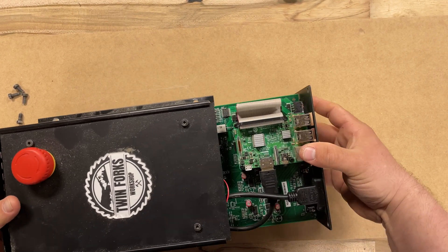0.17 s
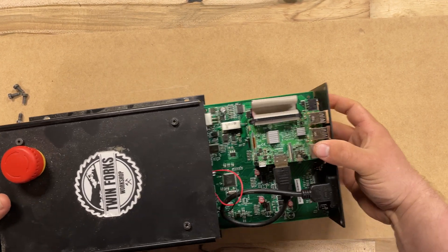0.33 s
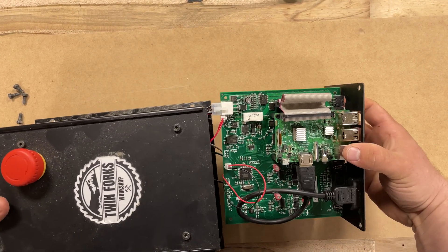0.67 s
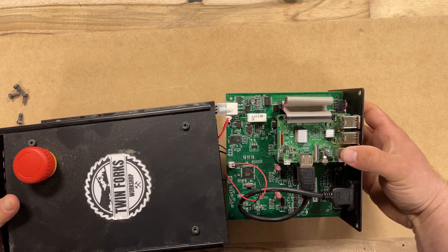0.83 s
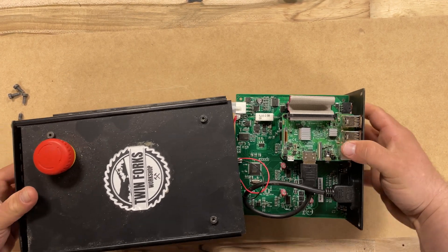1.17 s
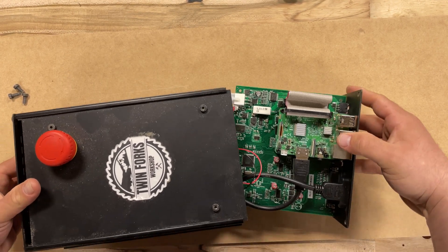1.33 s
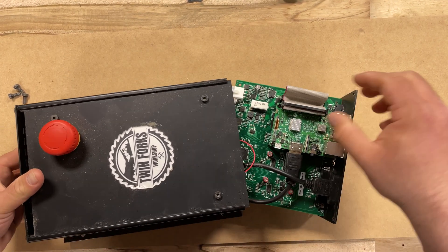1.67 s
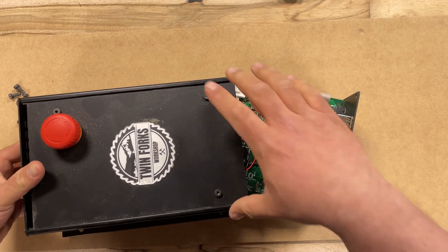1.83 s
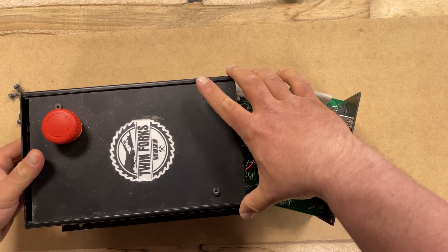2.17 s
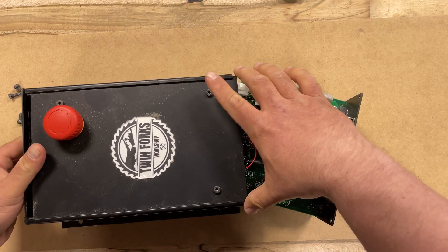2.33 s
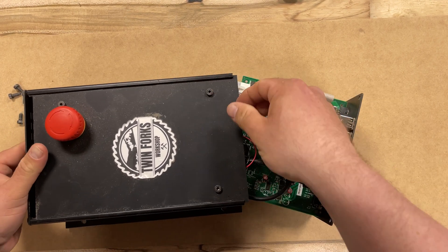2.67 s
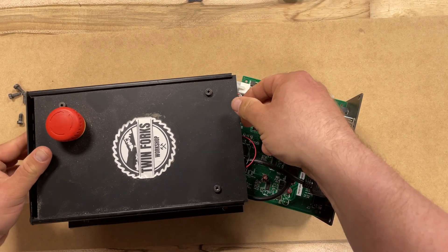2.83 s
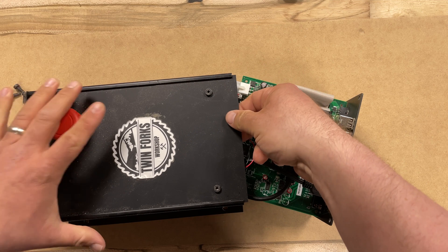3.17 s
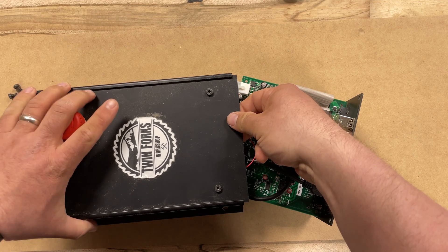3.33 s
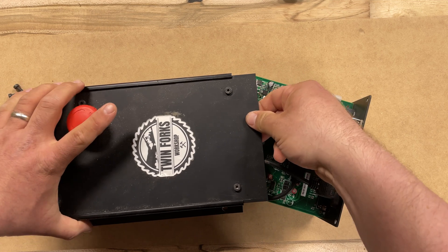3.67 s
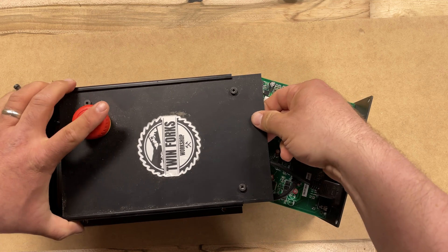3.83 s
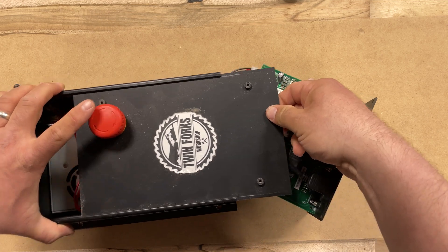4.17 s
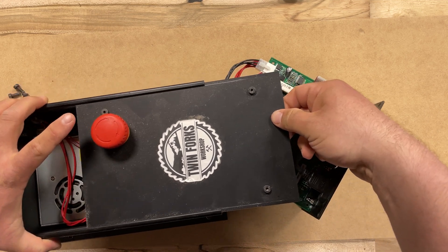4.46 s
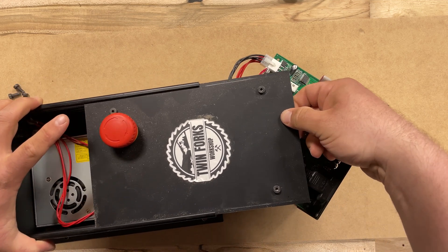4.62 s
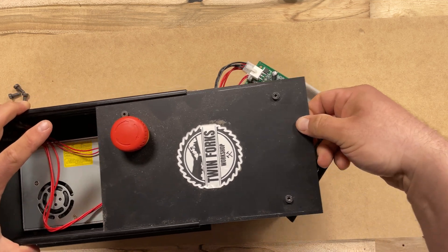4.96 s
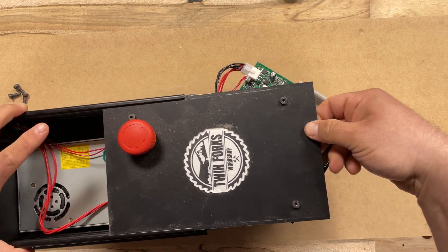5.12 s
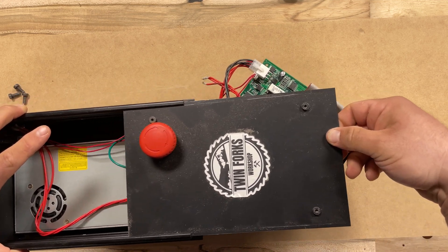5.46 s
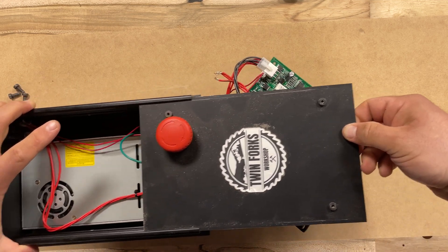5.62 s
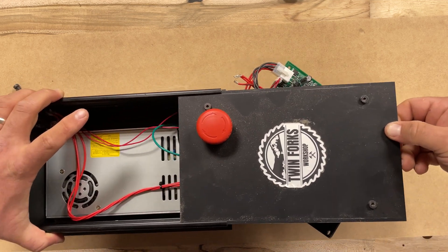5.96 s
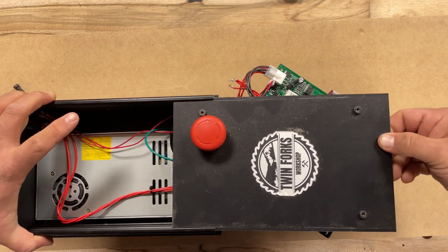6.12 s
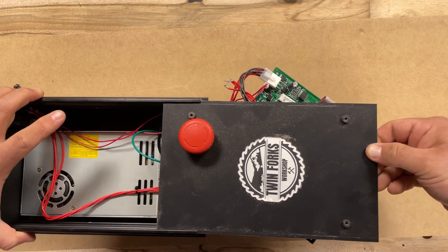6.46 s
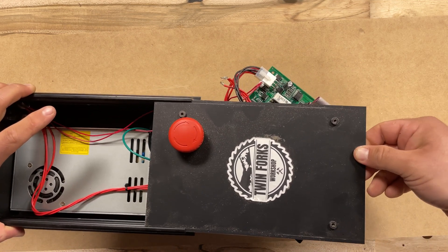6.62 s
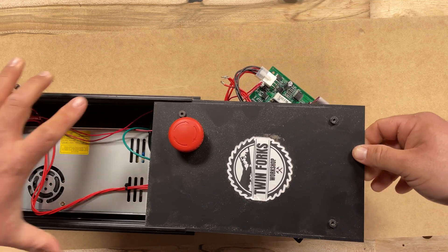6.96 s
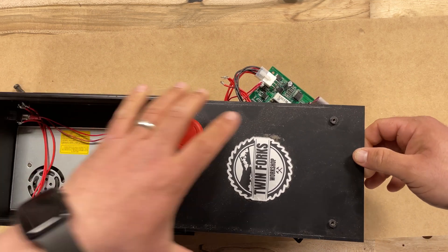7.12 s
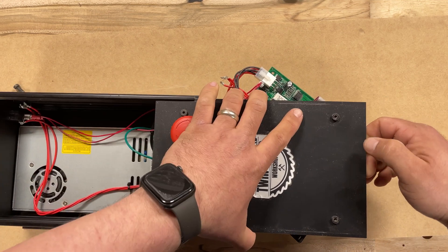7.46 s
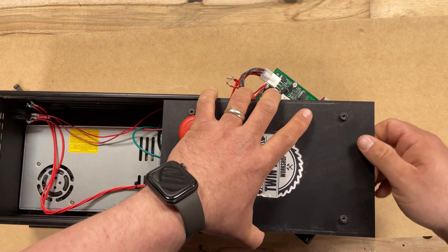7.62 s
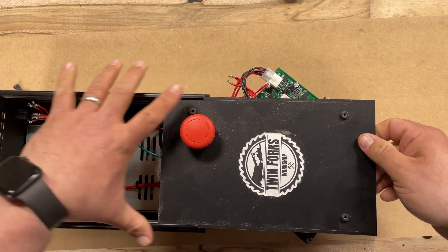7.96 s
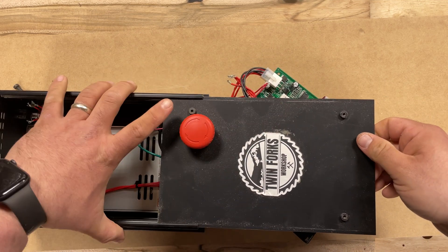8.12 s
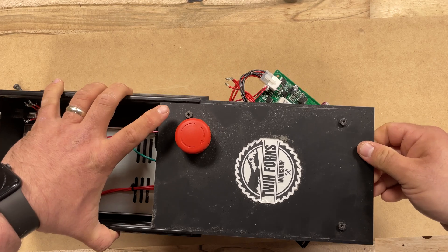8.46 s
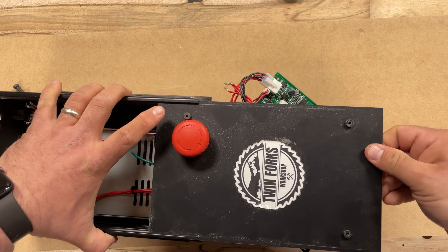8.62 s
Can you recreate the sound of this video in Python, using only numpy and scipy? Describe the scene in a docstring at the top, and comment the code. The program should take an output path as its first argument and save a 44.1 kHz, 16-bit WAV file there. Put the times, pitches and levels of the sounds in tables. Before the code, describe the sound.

Close up in a small workshop, a board scrapes out of a thin steel case with light rattling and a tiny screw ping. Two hollow knocks land on the wooden bench, then a softer one. After a sharp metallic clunk, the lid scrapes along its rails in uneven, gritty pulls, then falls nearly still before faint handling taps. A stereo microphone pair catches short reflections and low rumble.

```python
"""Steel case taken apart on a workbench

A circuit board is drawn out of a sheet-steel case and set down, the case knocks on the wooden bench,
then its lid is slid along its rails in uneven pulls, with taps, biting rails and pinging screws.
Slides are filtered random slips, blows and pings are sums of decaying modes, bites are resonant noise.
A small workshop adds reflections and a diffuse tail; a microphone pair hears it over rumble and hum."""
import sys
import numpy as np
from scipy import signal
from scipy.fft import rfft, irfft, next_fast_len
from scipy.io import wavfile

SR = 44100
rng = np.random.default_rng(int(sys.argv[2]) if len(sys.argv) > 2 else 0)


def wav_record(signal):
    """Record a signal, one row per channel, as 16-bit PCM in the file named by sys.argv[1]."""
    frames = np.transpose(np.atleast_2d(signal))
    bounded = np.clip(frames, -1, 1)
    # unit amplitude maps onto the largest positive 16-bit level
    quanta = np.round(bounded * 32767).astype(np.int16)
    wavfile.write(sys.argv[1], SR, quanta)


N = 387638


def from_db(db):
    """Decibels to amplitude gain."""
    return 10 ** (np.asarray(db) / 20)


def rms_one(x):
    """Scale to unit rms."""
    return x / np.sqrt(np.mean(x ** 2) + 1e-20)


def in_time(rows):
    """Draw each column of a timed curve at every sample."""
    seconds, *columns = np.transpose(rows)
    return [np.interp(np.arange(N) / SR, seconds, column) for column in columns]


def at_hz(points, hz):
    """Read a table on a log-frequency axis."""
    table = np.array(points)
    return np.interp(np.log(np.maximum(hz, 1)), np.log(table[:, 0]), table[:, 1])


def band(x, low, high, order=3):
    """Causal band-pass."""
    sos = signal.butter(order, [low, min(high, .45 * SR)], "band", fs=SR, output="sos")
    return signal.sosfilt(sos, x)


def coloured(x, spectrum):
    """Give a steady noise a spectrum."""
    size = next_fast_len(len(x))
    hz = np.arange(size // 2 + 1) * SR / size
    return irfft(rfft(x, size) * from_db(at_hz(spectrum, hz)), size)[:len(x)]


def drift(rate_hz):
    """Slow random wander with unit rms: noise through two equal low-pass poles."""
    step = 40   # samples between points of the wander
    r = np.exp(-2 * np.pi * rate_hz * step / SR)
    noise = rng.standard_normal(N // step + 2002)
    slow = signal.lfilter([1], [1, -2 * r, r * r], noise)[2000:]   # skip the filter's start
    return np.interp(np.arange(N) / step, np.arange(len(slow)), rms_one(slow))


def resonate(x, hz, width_hz):
    """A fixed resonance with gain 1 on top."""
    r = np.exp(-np.pi * width_hz / SR)
    zeros = np.array([1, 0, -1]) * (1 - r * r) / 2
    return signal.lfilter(zeros, [1, -2 * r * np.cos(2 * np.pi * hz / SR), r * r], x)


def gliding(x, hz, width_hz):
    """A resonance with gain 1 on top, whose centre moves from sample to sample."""
    r = np.exp(-np.pi * width_hz / SR)
    phase = np.cumsum(hz) * 2 * np.pi / SR
    phase = (phase % (2 * np.pi)).astype(np.float32)
    cos, sin = np.cos(phase), np.sin(phase)
    # shift the centre to zero, low-pass, and shift it back
    inphase, across = signal.lfilter([2 * (1 - r)], [1, -r], [x * cos, x * sin])
    return inphase * cos + across * sin


def dying(t, t60):
    """Exponential decay, 60 dB down after t60 seconds."""
    return np.exp(-np.log(1000) * t / t60)


# Spectrum of the room rumble. Each row: frequency in Hz, density in dB per Hz.
RUMBLE = [(20, -36), (29, -17), (40, -0.5), (62, -6), (95, -6.5), (140, -18.5), (250, -24.5), (480, -39.5),
          (1000, -38), (2800, -59), (9000, -53.5), (13000, -48), (15500, -70.5)]
# Level of the mains hum over time. Each row: time in seconds, level in dB.
HUM = [(0, -54.5), (1.2, -59.5), (2, -64.5), (3, -77), (8.79, -101)]
MAINS_HZ = 60


def background(rumble_db=-53.0, side_db=-19):
    """Rumble, nearly alike in both ears, and a faint wavering hum at twice the mains rate."""
    mid, side = (rms_one(coloured(rng.standard_normal(N), RUMBLE)) for _ in range(2))
    rumble = from_db(rumble_db) * (mid + from_db(side_db) * side * [[1], [-1]])
    hum_gain = from_db(in_time(HUM)[0] + 1.5 * drift(2))
    hum = hum_gain * np.sin(2 * np.pi * 2 * MAINS_HZ * np.arange(N) / SR)
    return rumble + hum


# Sliding strokes: the board is drawn out and set down, with a fading rattle until 1.7 s, the lid is
# pulled along its rails from 3.3 to 6.7 s, otherwise the hands shift their grip.
# Each row: start in seconds, length in seconds, level in dB, weight in dB, brightness in dB.
STROKES = [(-0.288, 0.35, -40, 0.5, -4), (0.2, 0.22, -46.5, 0.5, -4), (0.42, 0.41, -72.5, 9, -16),
           (0.785, 0.29, -68.5, 12, -16), (1.036, 0.32, -65, 7.5, -4), (1.197, 0.29, -47, 6, -4),
           (1.282, 0.45, -55.5, -3.5, -15), (2.08, 0.45, -68, 3.5, -3.5), (2.096, 0.059, -57, 14, -1),
           (2.39, 0.29, -63.5, 7, -1), (2.654, 0.037, -49, 13.5, -4.5), (2.669, 0.68, -80, 7.5, 1.5),
           (3.133, 0.13, -77, 11.5, 5), (3.278, 0.1, -58.5, 11.5, -15), (3.34, 0.22, -47, 0.5, 1.5),
           (3.368, 0.98, -55, 4.5, -3.5), (3.853, 0.29, -76.5, 27.5, 17), (4.005, 0.24, -46.5, 6, 5.5),
           (4.156, 0.19, -46, 5, 0), (4.19, 0.75, -50.5, 2.5, -3), (4.364, 0.29, -53, -18, 7),
           (4.477, 0.64, -48, 3.5, -10), (4.78, 0.24, -45, 2, 2.5), (4.972, 0.36, -54, 1, -6.5),
           (5.086, 0.089, -47.5, -17, 3.5), (5.19, 0.27, -51.5, -14, 1), (5.437, 0.42, -46, -1, -7),
           (5.485, 0.086, -46.5, -20, 2), (5.584, 0.2, -47.5, -7, -6), (5.664, 0.13, -36.5, -4, -9),
           (5.746, 0.11, -48, 7, -8.5), (5.805, 0.38, -52.5, 6, -9), (5.868, 0.14, -44, -21, -3),
           (6.07, 0.24, -50, 4, -9.5), (6.257, 0.14, -46.5, 0.5, -11), (6.325, 0.29, -45.5, 2, -8.5),
           (6.519, 0.17, -73, 13, 2.5), (6.661, 0.29, -75, 9.5, -2.5), (7.092, 0.59, -74.5, 1.5, 6),
           (7.14, 0.24, -68.5, 1, -5), (7.4, 0.36, -51, 3.5, -9.5), (7.663, 0.066, -65, 1, 10),
           (7.737, 0.55, -61, -1, -6.5), (8.04, 0.29, -59, 7, -9), (8.302, 0.17, -61, 6, -16),
           (8.441, 0.078, -50, 15, -6), (8.498, 0.094, -46, 5, -9.5), (8.574, 0.27, -63.5, 8, -2.5)]
# A tight, bright stroke lifts the top octave: offset, and share of its brightness.
TOP_LIFT_DB, TOP_FOLLOWS = 1.5, 0.56
# Level at both ends of a stroke against its middle, and how flat its top is.
STROKE_EDGE_DB, STROKE_FLATNESS = -17, 1.96


def stroke_gains():
    """Each stroke swells and fades in one bell; gains of drag, rasp, coarse hiss and fine hiss."""
    t, power = np.arange(N) / SR, np.zeros((4, N))
    for start, length, db, weight, brightness in STROKES:
        # the bell's skirts reach half a length beyond each end
        moving = slice(*np.searchsorted(t, [start - length / 2, start + length + length / 2]))
        off_centre = np.abs(2 * (t[moving] - start) / length - 1)
        swell = from_db(db + STROKE_EDGE_DB * off_centre ** STROKE_FLATNESS)
        lift = from_db(TOP_LIFT_DB + TOP_FOLLOWS * brightness)
        hiss = from_db(brightness) / np.hypot(1, lift)   # coarse and fine share the hiss power
        power[:, moving] += np.outer([from_db(weight), 1, hiss, hiss * lift], swell) ** 2
    return np.sqrt(power)


# Colour of the friction noise. Each row: frequency in Hz, density in dB per Hz.
FRICTION = [(110, 7), (195, 11), (280, 9.5), (420, 16), (540, 13.5), (740, 7.5), (1080, 8), (1400, 6),
            (2100, 3.5), (3200, -1), (4200, 4), (7300, -1.5), (8500, -5.5), (10500, -1), (13300, -5),
            (15500, -20)]
# Broad resonances of the sliding lid.
# Each row: frequency in Hz, width in Hz, level with closed lid in dB, level with open lid in dB.
LID = [(410, 60, 3, -10), (525, 55, 0, 5), (639, 39, -11.5, 2.5), (820, 34, -7, -5), (1043, 49, -3, 1.5),
       (1114, 46, -14, -0.5), (1300, 21, 5.5, -15), (1821, 180, -4, -10), (2620, 110, -1.5, -5.5),
       (5970, 290, -6, -11)]
# Blend from the closed-lid to the open-lid resonances. Each row: time in seconds, share from 0 to 1.
LID_BLEND = [(3.8, 0), (4.3, 0.8), (5.4, .65), (5.8, 0.92)]
# The boom of the closed box, and the share of it lost at full blend.
BOX_HZ, BOX_WIDTH_HZ, BOX_LOSS = 330, 420, 0.44


def sliding(slips_per_s=6000, size_db=1.5, smooth_db=-5, judder_db=1.2, grit_db=1.0, shift_db=4.0,
            bend=0.03, wobble_db=2.0, drag_db=-2.0, rasp_db=0.0, hiss_db=-0.5, ringing_db=3):
    """Tiny slips and gritty judder excite the lid; its resonances bend, waver and blend."""
    slipping = rng.random(N) < slips_per_s / SR
    size = from_db(size_db * np.minimum(rng.exponential(1, N), 4))
    slips = slipping * rng.choice([-1, 1], N) * size
    force = rms_one(slips) + from_db(smooth_db) * rng.standard_normal(N)
    force = force * from_db(judder_db * drift(20) + grit_db * drift(150))
    friction, blend = coloured(force, FRICTION), in_time(LID_BLEND)[0]

    ringing = np.zeros(N)
    for hz, width_hz, closed_db, open_db in LID:
        gain = from_db(closed_db + (open_db - closed_db) * blend + shift_db * drift(7))
        ringing += gain * gliding(friction, hz * (1 + bend * drift(2.1)), width_hz)
    lid = friction + from_db(ringing_db) * ringing
    box_boom = resonate(lid, BOX_HZ, BOX_WIDTH_HZ)
    lid = lid - np.clip(BOX_LOSS * blend, 0, 1) * box_boom

    # four registers, each levelled and then played by the strokes
    drag, rasp = rms_one(band(lid, 100, 700)), rms_one(band(lid, 700, 3000))
    coarse, fine = rms_one(band(lid, 3000, 7500)), rms_one(band(lid, 7500, 16000))
    drag_gain, rasp_gain, coarse_gain, fine_gain = stroke_gains()
    wobble = wobble_db * drift(5.5)   # the loose panel rocks as it moves
    low = from_db(drag_db + wobble) * drag_gain * drag
    middle = from_db(rasp_db) * rasp_gain * rasp
    high = from_db(hiss_db) * (coarse_gain * coarse + fine_gain * fine)
    return low + middle + high


def near_surfaces(x, early_db=-4, early_s=0.027, pass_round_hz=900, side_db=-1):
    """A sound at one spot with its quick reflections from bench and case; long waves pass round them."""
    t = np.arange(int(.06 * SR)) / SR
    mid, side = rng.standard_normal((2, len(t))) * dying(t, early_s) * (t > .0003)
    echoes = mid + from_db(side_db) * side * [[1], [-1]]
    echoes = from_db(early_db) * echoes / np.linalg.norm(echoes, axis=1, keepdims=True)
    high_pass = signal.butter(1, pass_round_hz, "high", fs=SR, output="sos")
    echoes = signal.sosfilt(high_pass, echoes)
    direct = t == 0
    return signal.fftconvolve(x[None], echoes + direct, axes=1)


def travelling(x):
    """A moving contact meets new reflections at every step of its way."""
    out, step = np.zeros((2, N + SR)), int(.15 * SR)
    for start in range(0, N, step):
        heard = near_surfaces(x[start:start + step])
        out[:, start:start + heard.shape[1]] += heard
    return out[:, :N]


# Modes of the case and its lid. Each row: frequency in Hz, level in dB, t60 in seconds.
CASE = [(74, -1.5, .18), (128, -6.5, .15), (196, -3.5, 0.25), (318, -4.5, 0.092), (365, 2, 0.17),
        (453, -2.5, 0.071), (502.3, 3.5, 0.1), (570, -7, 0.092), (640, -8, 0.3), (749, -4, 0.17),
        (857, -2.5, 0.24), (1034, 2, 0.14), (1075, -2.5, 0.42), (1289, -14, .15), (1410, -9.5, 0.14),
        (1670, -10.5, 0.074), (2140, -18, 0.15), (2400, -16, 0.15), (2590, -15.5, 0.16), (2690, -15.5, .15),
        (3290, -19.5, .15), (4030, -28.5, .2)]
# Chatter of the steel edges. Each row: frequency in Hz, density in dB per Hz.
CHATTER = [(200, -2), (1000, 6), (1600, 0.5), (2250, -8), (2900, -10.5), (3600, -10), (5000, -13),
           (7000, -5.5), (8500, -2.5), (12000, -6.5), (15500, -24)]


def blow(t, spot_hz, overtone_hz, chatter_s, ring_db, spot_db=9, overtone_db=0, damped_s=0.014,
         spread_db=3.0, chatter_db=8, seating_s=0.00095, swell_cycles=0.9):
    """Struck spot, overtone and case modes, mostly soaked up by the bench; the edges chatter as they seat."""
    stiffness_db = at_hz([(500, 2.0), (1400, -9.5)], spot_hz)   # stiff spots ring less
    struck = [(spot_hz, spot_db + stiffness_db, .14), (overtone_hz, overtone_db, .09)]
    hz, level_db, t60 = np.array(CASE + struck).T[:, :, None]
    strength = from_db(level_db + spread_db * rng.standard_normal(hz.shape))
    sign = np.where(hz > 700, rng.choice([-1, 1], hz.shape), 1)   # high modes: where the blow lands
    soaked = np.maximum(damped_s, 18 / hz)   # low modes need several cycles to die
    decay = dying(t, soaked) + from_db(ring_db) * dying(t, t60)
    swell = 1 - np.exp(-t * hz / swell_cycles)   # high modes speak first
    modes = sign * strength * np.sin(2 * np.pi * hz * t) * decay * swell
    chatter = coloured(rng.standard_normal(len(t)), CHATTER)
    seated = 1 - np.exp(-t / seating_s)
    return modes.sum(0) + from_db(chatter_db) * chatter * seated * dying(t, chatter_s)


# A soft contact cannot excite the high modes: softest hardness, its top edge, and the slope from there.
SOFTEST_DB, SOFTEST_HZ, HARDNESS_DB_PER_OCTAVE = -41, 950, 2.5


def cushioned(x, hardness_db):
    """The softer the contact, the lower its top edge."""
    edge_hz = SOFTEST_HZ * 2 ** ((hardness_db - SOFTEST_DB) / HARDNESS_DB_PER_OCTAVE)
    top_hz = np.clip(edge_hz, 300, .45 * SR)
    return signal.sosfilt(signal.butter(2, top_hz, fs=SR, output="sos"), x)


# Loose parts and fingers tap the case.
# Each row: start in seconds, pitch of the struck spot in Hz, level in dB, weight in dB, hardness in dB.
TAPS = [(0.065, 413, -48, -7, -12.5), (0.266, 467, -43, -1.5, -17), (0.313, 1120, -54, -13, -9),
        (0.332, 448, -44.5, 0, -7.5), (0.36, 355, -39, 4.5, -3.5), (0.481, 344, -60.5, 12.5, -8.5),
        (0.591, 332, -72.5, 11.5, -20), (0.634, 417, -68, 13, 1.5), (0.689, 353, -66.5, 10.5, -31),
        (0.766, 356, -73, 0, -4), (0.948, 366, -65, 5, -8), (1.024, 890, -77, -5, -3),
        (1.076, 640, -58, -5, -27), (1.435, 418, -38.5, 7.5, -25), (1.925, 406, -58, 7, -35),
        (2.032, 503, -73.5, 11, -40.5), (2.106, 486, -55.5, 9.5, -37), (2.516, 520, -58, 1.5, -16),
        (2.629, 365, -63.5, 15, -24), (2.683, 1530, -17.5, -43, -16), (2.688, 1390, -38.5, -9, 8),
        (3.053, 347, -79.5, 21.5, -16.5), (3.273, 400, -68.5, 8, -35), (3.296, 428, -66, 5.5, -1.5),
        (3.31, 470, -59, 9, -5), (3.432, 432, -62, 18, 6), (4.142, 520, -45.5, -14, -12),
        (4.245, 950, -50.5, -26, 9.5), (4.27, 528, -44.5, -23, 8), (4.653, 543, -51.5, -6, 5),
        (4.997, 430, -49, -11, -13), (5.221, 472, -42, -12.5, -9), (5.632, 497, -58.5, -8, 7.5),
        (6.79, 493, -62.5, -14.5, -2), (6.876, 570, -55.5, -13, -4.5), (7.144, 1140, -63, -16, -18),
        (7.249, 895, -68.5, -12, 3), (7.302, 900, -64, -14.5, -14), (8.175, 523, -45.5, -16, -19),
        (8.191, 1040, -41, -25, -42), (8.475, 525, -52, 1, -28), (8.496, 490, -47, -11, -26),
        (8.547, 1080, -57, -29, -10)]
TAP_THUMP_DB = -21.5   # a tap barely shakes the bench: thump against level plus weight
TAP_OVERTONE = 2.15   # a tapped spot's overtone, as a multiple of its pitch
TAP_CHATTER_S = 0.037   # t60 of a tap's chatter
TAP_RING_DB = -19   # free ringing of a tap
# Case and board come down on the bench.
# Each row: start in seconds, pitch of the struck spot in Hz, its overtone in Hz, level in dB,
# weight in dB, hardness in dB, thump of the bench in dB, chatter t60 in seconds,
# extra tick of a sharp edge in dB, lean to the right in dB, free ringing in dB.
KNOCKS = [(1.232, 555, 1087, -22.5, -9.5, -23.5, -36.5, 0.021, 7.5, 2, -16.5),
          (1.3543, 534, 1520, -18.5, -7.5, -8.5, -30.5, 0.053, -6, 1.5, -18.5),
          (1.6672, 411.5, 690, -28.5, -7.5, -35, -49.5, 0.021, -10.5, 3, -28),
          (2.6865, 388.5, 890, -21.5, -2.5, -21, -26.5, 0.029, 13, -5.5, -33),
          (2.6952, 487, 1423, -28.5, 5.5, -25.5, -49, 0.035, 4, -1.5, -27),
          (8.21, 327, 640, -55.5, -4, 1, -47, 0.023, -13, -7, -33),
          (8.458, 570, 1450, -42, -14, -24, -44, 0.054, 9, 3.5, -10)]
# Edges in Hz of the registers thump, boom, knock, clang, ring and tick.
REGISTERS = [45, 200, 450, 850, 2000, 5000, 15000]
# Weight mainly swells the boom and lifts the other registers less; hardness mainly lifts ring and tick.
# Rows are boom, knock, clang, ring, tick. Each row: offset in dB, share of weight, share of hardness.
VOICING = [(0.5, 1, 0.032), (3.5, 0.22, 0.018), (1.5, 0.032, 0.12), (-1, 0.31, 0.58), (0, 0.34, 1.2)]
# Share of a knock's sideways lean that each register shows, thump to tick.
DIRECTED = [0, 0.48, 0.62, 0.93, 0.041, 0]
LEAD_S_PER_DB = .00004   # how much sooner the nearer microphone hears it


def knocks(tick_s=0.17):
    """Contacts ring the case; weight and hardness voice the registers, place sets side and reflections."""
    t, out = np.arange(int(.2 * SR)) / SR, np.zeros((2, N + SR))
    attack = int(.025 * SR)   # levels refer to this opening stretch
    taps = [(s, hz, TAP_OVERTONE * hz, db, weight, hard,
             db + weight + TAP_THUMP_DB, TAP_CHATTER_S, 0, 0, TAP_RING_DB)
            for s, hz, db, weight, hard in TAPS]
    columns = np.transpose(list(KNOCKS) + taps)
    times, spots, overtones, level, weight, hardness, thump, chatter, edge, right, free = columns
    boom, knock, clang, ring, tick = (level + db + heavy * weight + hard * hardness
                                      for db, heavy, hard in VOICING)
    levels = [thump, boom, knock, clang, ring, tick + edge]

    blows = []
    for hz, overtone_hz, chatter_s, ring_db, hard in zip(spots, overtones, chatter, free, hardness):
        soft = cushioned(blow(t, hz, overtone_hz, chatter_s, ring_db), hard)
        blows.append(near_surfaces(soft)[:, :len(t)])
    blows = np.array(blows)

    for k, (low, high) in enumerate(zip(REGISTERS, REGISTERS[1:])):
        steepness = 2 if high < 1000 else 4
        parts = band(blows, low, high, order=steepness) * (-1) ** min(k, 2)   # the boom is inverted
        if high == REGISTERS[-1]:
            parts = parts * dying(t, tick_s)   # the finest detail of a contact is over first
        for s, db, lean, part in zip(times, levels[k], right * DIRECTED[k], parts):
            for ear, near_db in enumerate((-lean / 2, lean / 2)):
                start = round((s - LEAD_S_PER_DB * near_db) * SR)
                gain = from_db(db + near_db) / np.std(part[ear, :attack])
                out[ear, start:start + len(t)] += part[ear] * gain
    return out[:, :N]


# Ring of the loose screws. Each row: frequency in Hz, level in dB, t60 in seconds.
SCREW_MODES = [(2890, -2.5, 0.17), (3990, -6, 0.26), (4200, -22, 0.26), (5560, -0.5, 0.12)]
SCREW_T60_S = 0.15   # the longest ring that the bench allows
# A screw is nudged. Each row: start in seconds, level in dB.
SCREW = [(0.264, -57.5), (0.332, -59), (0.367, -41)]


def screw():
    """Small steel parts ping as they are nudged: a few decaying sines, the strongest at unit gain."""
    t, out = np.arange(SR // 2) / SR, np.zeros(N)
    top_db = max(db for hz, db, t60 in SCREW_MODES)
    ping = np.zeros(len(t))
    for hz, db, t60 in SCREW_MODES:
        ping += from_db(db - top_db) * np.sin(2 * np.pi * hz * t) * dying(t, min(t60, SCREW_T60_S))
    for s, db in SCREW:
        start = int(s * SR)
        out[start:start + len(ping)] += from_db(db) * ping
    return out


# The lid's edge bites into the rail.
# Each row: start in seconds, length in seconds, frequency in Hz, width in Hz, level in dB.
BITES = [(3.37, 0.15, 2540, 160, -60), (4.28, 0.46, 2660, 200, -60.5), (5.105, 0.37, 3280, 1500, -58.5),
         (5.53, 0.2, 2680, 450, -52.5)]


def rail_bites(rough_db=2.0):
    """The lid's edge sticks and slips in the rail: rough noise rasps through one doubled resonance."""
    t, out = np.arange(N) / SR, np.zeros(N)
    force = rng.standard_normal(N) * from_db(rough_db * drift(60))
    for start, length, hz, width_hz, db in BITES:
        biting = (t > start) & (t < start + length)
        swell = np.sqrt(np.abs(np.sin(np.pi * (t[biting] - start) / length)))
        rasp = resonate(resonate(force[biting], hz, width_hz), hz, width_hz)
        out[biting] += from_db(db) * swell * rms_one(rasp)
    return out


def lingering(power, t60, delay_s):
    """Sound energy arrives after a delay and dies away; its total is kept."""
    r = dying(1 / SR, max(t60, .005)) ** 2   # squared, as power falls twice as fast
    lag = max(int(delay_s * SR), 0)
    return signal.lfilter([1 - r], [1, -r], np.pad(power, (lag, 0))[:N] + 1e-18)


# Likeness of the echoes at the two microphones. Each row: frequency in Hz, correlation from -1 to 1.
LIKENESS = [(100, 0.84), (300, 1), (550, -0.11), (1200, -0.31), (3000, 0.77), (7000, 0.89)]


def two_ears(white, low, high):
    """A band of noise, as alike at the two microphones as the echoes are."""
    mid, side = rms_one(band(white, low, high, order=2))
    alike = np.clip(at_hz(LIKENESS, np.sqrt(low * high)), -1, 1)
    mid, side = np.sqrt((1 + alike) / 2) * mid, np.sqrt((1 - alike) / 2) * side
    return np.array([mid + side, mid - side])


# Decay of the workshop. Each row: frequency in Hz, t60 in seconds.
DECAY = [(70, 0.01), (250, 0.32), (1000, 0.38), (2500, 0.31), (5000, 0.36), (9000, 0.26), (15000, 0)]


def workshop(x, late_db=-8, late_delay_s=0.0082, absorbed_hz=600):
    """The walls return a diffuse tail in each band, weaker in the bass."""
    edges = 90 * 2 ** np.linspace(0, 7.6, 14)
    white = rng.standard_normal((2, 2, N))   # two noise pairs, taken in turn by neighbouring bands
    source, out = x.mean(0), x.copy()
    for k, (low, high) in enumerate(zip(edges, edges[1:])):
        hz = np.sqrt(low * high)
        power = lingering(band(source, low, high, order=2) ** 2, at_hz(DECAY, hz), late_delay_s)
        gain = from_db(late_db) * hz / np.hypot(hz, absorbed_hz)
        out += gain * np.sqrt(power) * two_ears(white[k % 2], low, high)
    return out


def scene():
    """The case in its room."""
    contacts = travelling(sliding() + screw() + rail_bites()) + knocks()
    return background() + workshop(contacts)


# Level of the right microphone over the left. Each row: frequency in Hz, level in dB.
RIGHT_LEAD = [(100, 1), (300, 1.5), (550, 1.5), (1100, 4), (2000, 0), (3500, 4.5), (6500, 8), (8000, -5),
              (15000, -1.5)]
# The right microphone hears the case first. Each row: frequency in Hz, phase lead in radians.
RIGHT_PHASE = [(100, 0.1), (300, 0.33), (560, 0.49), (1100, 0.3), (1700, 0.12), (2800, 1), (4400, 0.51),
               (7000, 0.29)]


def microphones(x):
    """The pair leans right; in the top octave both sides carry one signal, the right about 0.2 ms later."""
    size = next_fast_len(N + SR // 10)
    hz = np.arange(size // 2 + 1) * SR / size
    left, right = rfft(x, size) * from_db(at_hz(RIGHT_LEAD, hz) * np.array([[-.5], [.5]]))
    left = left * np.exp(-1j * at_hz(RIGHT_PHASE, hz))
    turn = np.pi / 2 * np.clip((hz - 7200) / 500, 0, 1)   # crossfade from right to lagged left
    lagged = left * np.exp(-2j * np.pi * (hz - 10800) / 4950)   # delay of 1/4950 s
    right = np.cos(turn) * right + np.sin(turn) * lagged
    return irfft(np.array([left, right]), size)[:, :N]


CUTOFF_HZ = 15900


def record(dry):
    """Microphone pair, rounded peaks, steep top cut."""
    rounded = 1.3 * np.tanh(microphones(dry) / 1.3)
    top_cut = signal.ellip(10, .2, 80, CUTOFF_HZ, fs=SR, output="sos")
    return signal.sosfilt(top_cut, rounded)


dry = scene()
out = record(dry)
wav_record(out)
```